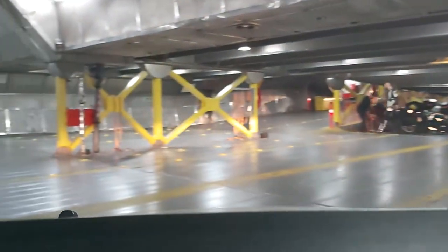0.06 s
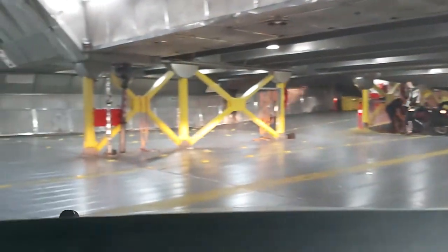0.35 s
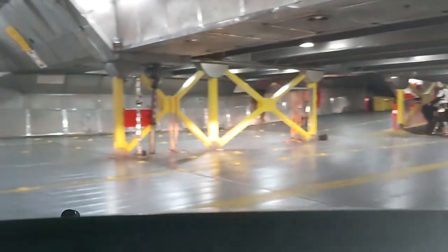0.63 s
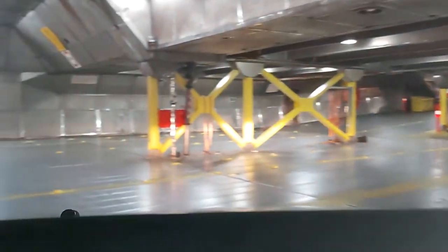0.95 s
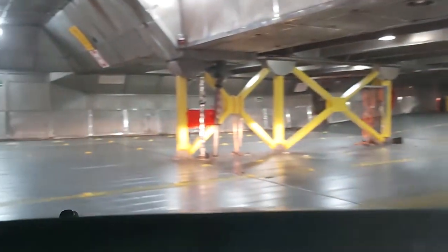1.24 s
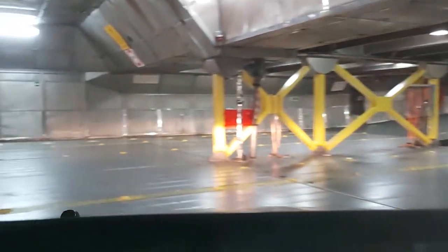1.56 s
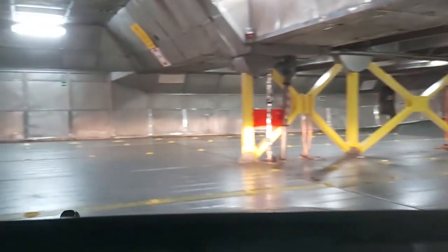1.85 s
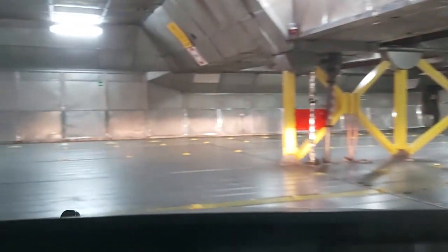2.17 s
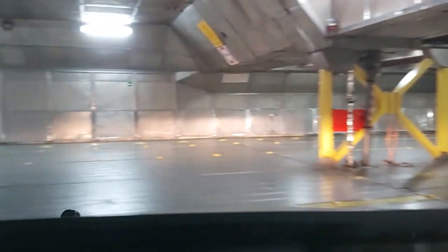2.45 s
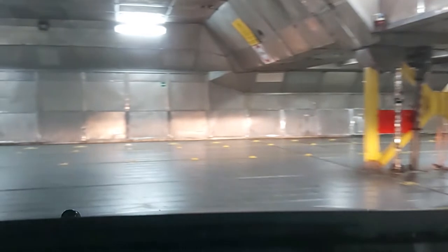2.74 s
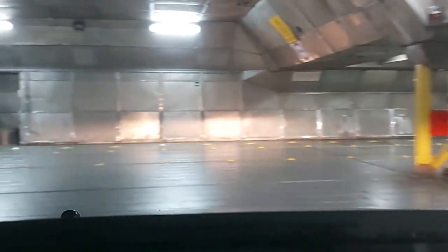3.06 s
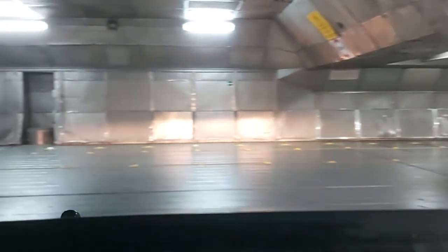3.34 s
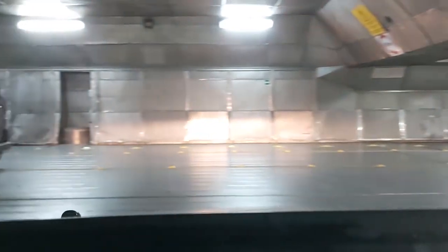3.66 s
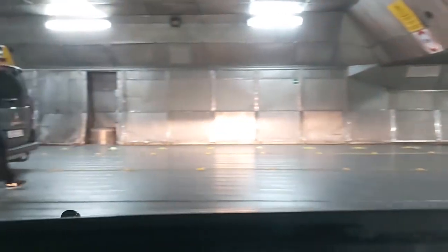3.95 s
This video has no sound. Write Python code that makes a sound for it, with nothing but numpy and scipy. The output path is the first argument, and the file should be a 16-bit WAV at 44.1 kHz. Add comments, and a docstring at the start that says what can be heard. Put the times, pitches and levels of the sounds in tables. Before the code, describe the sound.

Low engine hum and tyre rumble fill a car's cabin as it crosses a ship's metal hold. The hum and a higher machinery drone fade midway and return, over quiet rushing air, a faint hiss and one tiny squeak.

```python
"""A deep engine hum, heard from inside a car rolling slowly across a ferry's steel vehicle deck.
The hum beats against a weaker neighbouring tone, fading and returning as the car moves through the hold,
with a machinery drone above it. Engine and tyres rumble through the car body as dark, resonant noise.
Ventilation rushes behind with a breathy fan whine; midway a faint hiss passes, then one tiny squeak."""
import sys
import numpy as np
from scipy.fft import rfft, irfft, next_fast_len
from scipy.io import wavfile
from scipy.ndimage import map_coordinates

SR = 44100
rng = np.random.default_rng(int(sys.argv[2]) if len(sys.argv) > 2 else 0)


def materialize(psi):
    """Save the field psi as 16-bit PCM at rate SR to the path in sys.argv[1].

    A 1-D psi becomes a single channel; in a 2-D psi each row is a channel.
    """
    bounded = np.clip(np.atleast_2d(psi).T, -1, 1)
    quanta = np.round(bounded * 32767).astype(np.int16)
    wavfile.write(sys.argv[1], SR, quanta)


N = 176400

# envelopes of the engine hum and the machinery drone: t/s, level/dB
HUM_LEVEL = [(0, -24.5), (.15, -20.5), (.7, -24), (1.15, -22.5), (1.6, -23), (1.85, -33), (2.05, -34.5),
             (2.35, -26.5), (2.55, -29), (2.8, -24), (3.12, -18.5), (3.3, -25.5), (3.45, -22), (3.65, -23),
             (3.87, -30.5), (4, -26)]
DRONE_LEVEL = [(0, -35.5), (.28, -31.5), (.55, -32.5), (.85, -33), (1.1, -36.5), (1.55, -35.5),
               (2.1, -40.5), (2.5, -31), (2.9, -30), (3.1, -40), (3.25, -38), (3.45, -28), (3.7, -32),
               (4, -39)]
# drone pitch, sagging midway: t/s, f/Hz
DRONE_PITCH = [(0, 297.7), (1.4, 298.9), (1.85, 292), (2.3, 292.4), (2.65, 299), (4, 299.4)]
# weaker machinery tones: f/Hz, level/dB
MACHINE_TONES = [(56.3, -40.5), (120.6, -38), (176, -42.5), (188, -43.5), (244, -45), (324.5, -44.5),
                 (371, -45), (423, -49), (616, -60)]
# colour of the cabin rumble, mid and side: f/Hz, relative level/dB
RUMBLE_MID_EQ = [(20, -34.5), (30, -10), (42, -5.5), (54, 1.5), (68, 0.5), (88, -2), (115, -2.5), (140, -1),
                 (175, 1), (220, -4), (255, -3), (310, -4), (400, -12.5), (480, -13.5), (620, -18.5),
                 (760, -28), (1100, -73)]
RUMBLE_SIDE_EQ = [(20, -38), (55, 6.5), (120, 10.5), (200, 3.5), (260, 8), (310, 7), (380, 4), (620, 2),
                  (800, -6), (1200, -51)]
# envelopes of the rumble and the car body's boom: t/s, level/dB
RUMBLE_LEVEL = [(0, -23.5), (.5, -26.5), (1.2, -27), (1.8, -28.5), (2.4, -26.5), (2.85, -26), (3.4, -29),
                (4, -27.5)]
BOOM_LEVEL = [(0, -53), (.9, -48), (1.5, -40), (2.1, -42), (2.7, -41.5), (3.2, -38.5), (4, -45)]
# colour of the rushing air, mid and side: f/Hz, relative level/dB
AIR_MID_EQ = [(300, -18), (750, -1.5), (980, 2), (1150, -6.5), (1340, 1), (1600, -2), (2100, -4.5),
              (3000, -9.5), (4300, -14.5), (5100, -24), (6500, -30), (7300, -32), (8700, -39), (9300, -51),
              (13000, -46), (15500, -48)]
AIR_SIDE_EQ = [(300, -16.5), (750, 3), (880, -1), (980, 4), (1100, -3), (1400, -1.5), (1650, -3.5),
               (2100, -13.5), (3100, -10), (4300, -20), (5100, -26), (6500, -33), (7300, -38),
               (8700, -41.5), (9300, -52.5), (13000, -45.5), (15500, -48)]
# envelopes of the air (before its mid and side gains), fan whine and passing hiss: t/s, level/dB
AIR_LEVEL = [(0, -47.5), (.7, -49), (1.4, -49.5), (1.9, -49.5), (2.5, -48.3), (3.1, -49), (4, -49.5)]
WHINE_LEVEL = [(0, -61), (.45, -53), (1.1, -60.5), (1.45, -55.5), (1.9, -72.5), (2.6, -60.5), (3.4, -67),
               (4, -62)]
HISS_LEVEL = [(0, -95), (1.2, -91.5), (1.7, -81.5), (1.9, -75), (2.075, -74), (2.09, -70.5), (2.13, -72.5),
              (2.18, -69), (2.27, -80.5), (2.7, -90.5), (4, -96.5)]
# colour of the hiss: f/Hz, relative level/dB
HISS_EQ = [(3000, -27), (5500, -4), (7300, 3.5), (9500, -2), (14000, -4.5), (16000, -12)]
# squeak cue: t/s, f/Hz, level/dB
SQUEAKS = [(2.42, 3860, -52)]
# stereo balance in the cabin: f/Hz, left minus right level/dB
BALANCE = [(30, -0.7), (70, -2.2), (120, -0.9), (200, -1.5), (300, -4.5), (550, 0), (1000, -1.4),
           (2000, -3), (2800, -4.5), (4200, 0.5), (6000, 0), (8500, -5.5), (14000, -2.5)]

HUM_HZ, TOP_HZ = 112.12, 15700
DRONE_FLUTTER_DB, TONE_WAVER_DB = 2.5, 3
RUMBLE_SIDE_DB, AIR_MID_DB, AIR_SIDE_DB, FLOOR_DB = -10, .5, 3.5, -91


def engines():
    """The deep hum beats against the nearest of the weak machinery tones; a drone flutters on top."""
    hum = amp(curve(HUM_LEVEL)) * tone(HUM_HZ, drift_hz=.25)
    drone_gain = amp(curve(DRONE_LEVEL) + DRONE_FLUTTER_DB * wobble(13))
    drone = drone_gain * tone(curve(DRONE_PITCH), drift_hz=2.2)
    machinery = sum(amp(db + TONE_WAVER_DB * wobble(4)) * tone(hz, drift_hz=1.224)
                    for hz, db in MACHINE_TONES)
    return hum + machinery + drone


def cabin_rumble():
    """Engine and tyres on the deck boom through the car body; one resonance swells along the way."""
    body = stereo(noise(RUMBLE_MID_EQ), amp(RUMBLE_SIDE_DB) * noise(RUMBLE_SIDE_EQ))
    gain = amp(curve(RUMBLE_LEVEL) + .7 * wobble(8.1))
    boom = amp(curve(BOOM_LEVEL)) * resonance(hz=392, half_width_hz=28)
    return gain * body + boom


def ventilation():
    """A wide bed of rushing air with a narrow, breathy fan whine."""
    air = stereo(amp(AIR_MID_DB) * noise(AIR_MID_EQ), amp(AIR_SIDE_DB) * noise(AIR_SIDE_EQ))
    gain = amp(curve(AIR_LEVEL) + .37 * wobble(12))
    whine = amp(curve(WHINE_LEVEL)) * resonance(hz=1327, half_width_hz=42)
    return gain * air + whine


def passing_hiss():
    """A faint, grainy hiss swells and fades, with separate noise in each ear."""
    grain_db = 2 * wobble(150)
    return amp(curve(HISS_LEVEL) + grain_db) * np.array([noise(HISS_EQ), noise(HISS_EQ)])


def squeak(half_width_s=.004):
    """A tiny squeak, perhaps of the cabin trim: pitched noise under a bell-shaped envelope."""
    t = np.arange(N) / SR
    return sum(amp(db) * np.exp(-((t - at) / half_width_s) ** 2) * resonance(hz, half_width_hz=180)
               for at, hz, db in SQUEAKS)


def tone(hz, drift_hz):
    """A sine of rms 1 whose pitch wanders a little."""
    turns = np.cumsum(hz + drift_hz * wobble(5)) / SR + rng.random()
    return np.sqrt(2) * np.sin(2 * np.pi * turns)


def noise(eq):
    """Noise of rms 1, coloured by an EQ curve."""
    return unit(filtered(rng.standard_normal(N), lambda hz: amp(eq_at(eq, hz))))


def resonance(hz, half_width_hz):
    """Noise of rms 1 ringing in one narrow band."""
    return unit(filtered(rng.standard_normal(N), lambda f: 1 / (1 + ((f - hz) / half_width_hz) ** 2)))


def filtered(x, response):
    """Shape x with a frequency response, mirroring its ends to keep them clean."""
    edge = SR // 4
    padded = np.pad(x, [(0, 0)] * (x.ndim - 1) + [(edge, edge)], mode="reflect")
    size = next_fast_len(N + 2 * edge)
    spectrum = rfft(padded, size) * response(np.fft.rfftfreq(size, 1 / SR))
    return irfft(spectrum, size)[..., edge:edge + N]


def eq_at(eq, hz):
    """An EQ curve's dB at hz, on a log frequency axis."""
    f, db = np.transpose(eq)
    return np.interp(np.log(hz + 1), np.log(f + 1), db)


def curve(rows):
    """Automation breakpoints as one value per sample."""
    return np.interp(np.arange(N) / SR, *np.transpose(rows))


def wobble(rate):
    """Smooth random modulation, rate knots a second."""
    return map_coordinates(rng.standard_normal(1024), [np.arange(N) * rate / SR + 2], mode="wrap")


def stereo(mid, side):
    """Mid and side to left and right."""
    return np.array([mid + side, mid - side])


def amp(db):
    """Decibels to gain."""
    return 10 ** (np.asarray(db) / 20)


def unit(x):
    """Scale to rms 1."""
    return x / np.sqrt(np.mean(x ** 2) + 1e-20)


def scene():
    """The mix behind the windscreen, leaning a little to the right."""
    cabin = engines() + cabin_rumble() + ventilation() + passing_hiss() + squeak()
    return filtered(cabin, lambda hz: amp(np.outer([.5, -.5], eq_at(BALANCE, hz))))


def record(dry):
    """Faint microphone self-noise and a brick-wall high cut."""
    self_noise = amp(FLOOR_DB) * rng.standard_normal((2, N))
    return filtered(dry + self_noise, lambda hz: hz < TOP_HZ)


dry = scene()
out = record(dry)
materialize(out)
```